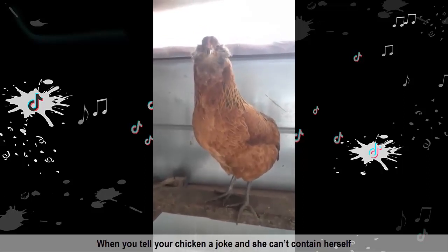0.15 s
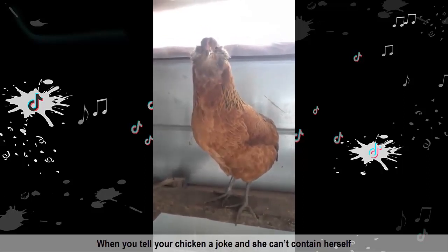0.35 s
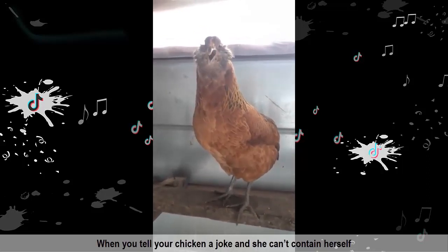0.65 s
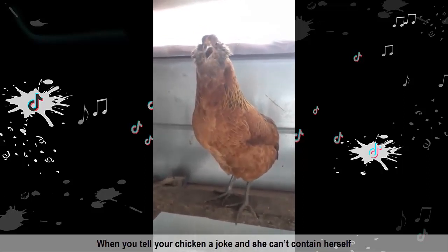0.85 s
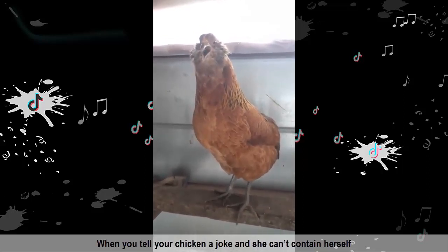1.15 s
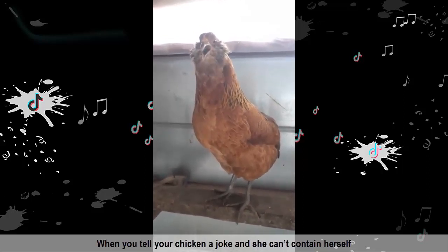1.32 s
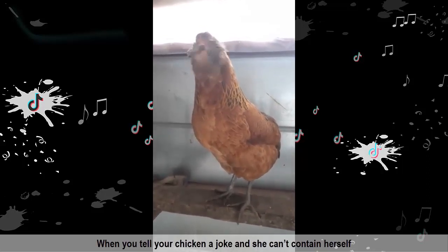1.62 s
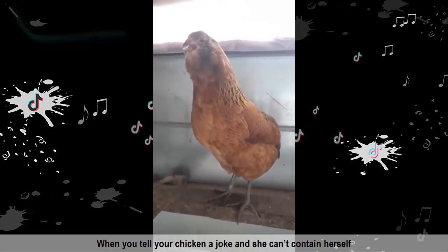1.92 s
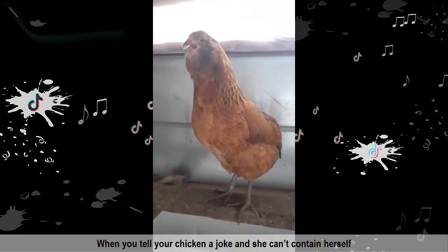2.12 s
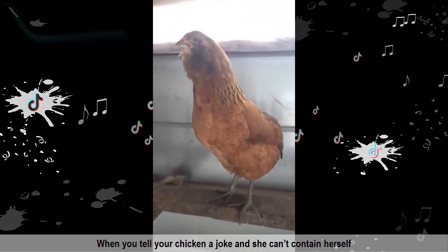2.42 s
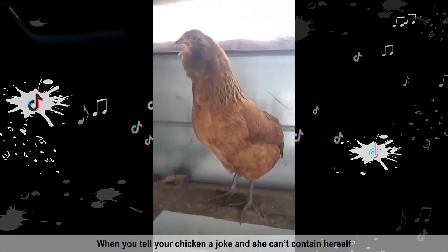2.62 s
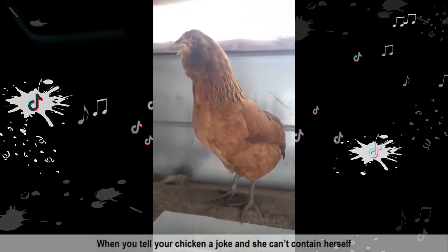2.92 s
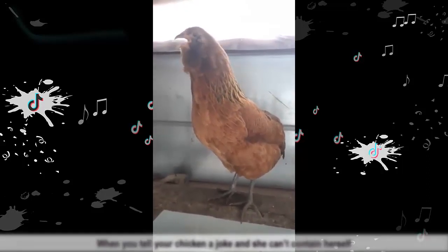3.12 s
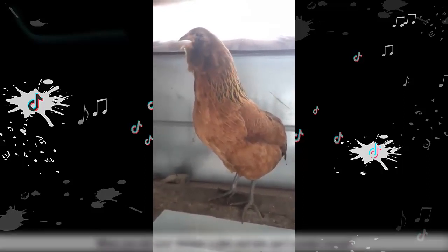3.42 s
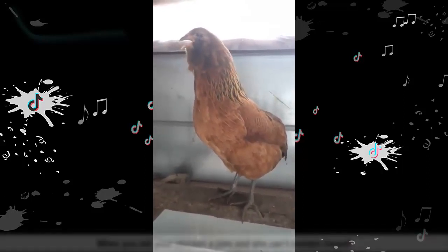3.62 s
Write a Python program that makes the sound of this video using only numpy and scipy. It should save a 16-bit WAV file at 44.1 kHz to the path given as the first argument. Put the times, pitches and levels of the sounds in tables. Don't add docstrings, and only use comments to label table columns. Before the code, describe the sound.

A hen cackles close to a stereo phone in a small, briefly echoing coop. Low yard rumble leads in; at 0.3 s her rough voice swells, dips low, then jumps into a held squawk from 0.7 to 1 s. About six low croaking clucks per second follow until 3.8 s, most flipping up to short ringing notes, though plainer around 1.8-2.3 s. Feet knock boards softly, strongest near 2.1 s.

```python
import sys
import numpy as np
from scipy import signal
from scipy.fft import rfft, irfft
from scipy.io import wavfile
from scipy.ndimage import uniform_filter1d

SR = 44100
rng = np.random.default_rng(int(sys.argv[2]) if len(sys.argv) > 2 else 0)


def gain_from_decibels(decibels):
    exponent = np.asarray(decibels, float) / 20
    return 10 ** exponent


def dump_mix(stems):
    frames = np.atleast_2d(stems).T
    limited = np.clip(frames, -1, 1)
    pcm = np.round(limited * 32767).astype(np.int16)
    wavfile.write(sys.argv[1], SR, pcm)


N = 165375

# time in seconds, effort in dB, pitch in Hz, mouth opening as a share.
SWELL = [
    (.322, -23, 374.2, 0.63),
    (0.376, -31, 340.7, 0.61),
    (0.392, -21, 345, 0.67),
    (0.431, -24.5, 396.2, 0.78),
    (.53, -20.5, 410, 0.87),
    (.575, -17.5, 263, 0.94),
    (0.599, -16, 248, 0.934),
    (.655, -16, 262.6, 0.97),
    (.69, -17, 287.3, 1.1),
]
SWELL_ROUGH = [.5, 1, .5, .95, 1, .7, .25, .25, .7]
# time in seconds, effort in dB, pitch in Hz, mouth opening as a share.
HELD = [
    (.69, -16, 425.7, 0.96),
    (0.751, -12, 436, 0.87),
    (0.77, -17.5, 429.5, 1.14),
    (.80, -16.5, 450.4, 1.53),
    (.825, -16.5, 453.8, 1.14),
    (0.892, -16.5, 446, 1.26),
    (0.914, -17, 454, 1.17),
    (0.928, -16, 455.6, 1.164),
    (0.976, -21, 445, 1.1),
]
HELD_ROUGH = [.4, .12, .5, .6, .1, .04, .05, .3, .8]
# time in seconds, throat tuning as a share,
# tilt in dB toward the lower of the two main resonances.
NECK = [(.4, 1.08, 4), (0.631, 0.98, -3), (.85, .99, 0.5), (1.05, 1.025, 0.5), (1.2, 1, 1.5),
        (1.38, 1.018, 1), (1.55, 0.94, -0.2), (1.72, 0.99, 2.8), (1.9, 0.95, 1.4), (2.15, 0.93, 1.8),
        (2.35, 0.98, 3.5), (2.55, 0.95, -0.4), (2.72, .98, 1.5), (2.9, 0.98, 2.5), (3.098, 1, 4),
        (3.279, 1, 2.5), (3.45, .97, 3), (3.64, 0.98, -.7)]
# start in seconds, length in seconds, effort in dB, pitch in Hz.
CROAKS = [(0.977, 0.081, -17, 304.3), (1.122, 0.11, -17.5, 297.2), (1.294, 0.11, -18, 296.8),
          (1.466, 0.097, -18.5, 295.3), (1.636, 0.086, -18.5, 294.6), (1.798, 0.097, -19.5, 292.3),
          (1.958, 0.078, -20, 286.3), (2.118, 0.083, -19.5, 278.4), (2.279, 0.11, -19, 299.4),
          (2.476, 0.067, -18, 291.7), (2.644, 0.086, -18.5, 299), (2.844, 0.091, -18.5, 303.6),
          (3.029, 0.093, -19, 305.3), (3.216, 0.045, -17.5, 295.1), (3.386, 0.042, -17.5, 309.5),
          (3.563, 0.039, -19.5, 312.4), (3.746, 0.052, -20.5, 293)]
CROAK_ROUGH = [.5, .25, .35, .5, .42, .5, .7, .55, .3, .5, .55, .6, .6, .6, .45, .6, .5]
# start in seconds, length in seconds, effort in dB, top pitch in Hz.
RINGS = [(1.02, 0.058, -17.5, 486), (1.208, 0.042, -19.5, 470), (1.375, 0.043, -17.5, 463.8),
         (1.551, 0.035, -21, 460.5), (1.718, 0.04, -25.5, 456), (2.381, 0.03, -22.5, 458.2),
         (2.54, 0.035, -16.5, 452), (2.713, 0.043, -18, 461), (2.909, 0.049, -16, 470),
         (3.094, 0.049, -16.5, 469), (3.258, 0.067, -15.5, 468), (3.432, 0.063, -16, 476.4),
         (3.6, 0.073, -16, 454.7)]
RING_ROUGH = [.6, .55, .6, .4, .7, .65, .2, .35, .22, .2, .1, .08, .05]
# frequency in Hz, width in Hz, level in dB.
THROAT = [(410, 181, -13), (713, 309, -8), (1025.7, 246, -1.2), (1397, 262, 3), (1973, 694, -11.5),
          (2457, 230, -13), (3220, 890, -11), (5280, 4200, -26), (6750, 4040, -25), (10860, 6200, -36)]
# frequency in Hz, width in Hz, depth from 0 to 1.
POCKETS = [(1653, 198, 0.62), (2586, 316, 1), (4307, 370, 1)]
# time in seconds, peak in dB, pitch in Hz, time to fall by 60 dB in seconds.
KNOCKS = [
    (0.083, -46, 74, 0.45),
    (1.668, -41, 99.4, 0.23),
    (1.884, -31, 222, 0.08),
    (1.978, -32, 170.3, 0.102),
    (2.111, -23, 213, 0.18),
    (3.592, -46, 87.5, 0.11),
]
# frequency in Hz, level in dB per Hz.
YARD = [(15, -57), (25, 16.5), (151, -23.5), (192, -5.5), (425, -27.5), (1360, -27), (9660, -42),
        (12600, -30.5), (14000, -72.5)]
# frequency in Hz, time to fall by 60 dB in seconds.
COOP = [(300, 0.25), (790, 0.16), (2090, 0.24), (5510, 0.22)]

JITTER, SHIMMER_DB, AIR = .16, 5, .55
HISS, TOP_PARTIAL_HZ = .36, 13050
STOP_S = 0.0099

CROAK_DIP, CROAK_CLIMB = 0.085, 0.04004
TICK_DB, TICK_GAP_S, CROAK_RISE_S = -13, .002, .014

RING_FLAT, RING_SAG, RING_TOP = .03, .14, 0.48
RING_START_DB, RING_END_DB = -4.5, -9
RING_CHEST_DB, RING_BLOOM_DB, RING_LOCK_DB = -1, 1, -3
RING_SHIFT_DB = 11

WANDER, POCKET_SINK = .03, .02

LEFT_LEAD_S, TREBLE_PAN_DB = 0.00029, 5
SHADE_DB = 2.
TAIL_DB, WALL_DB = -6, -14
SCATTER_DB, SCATTER_S = 4, .011
HEAD_TURN_S = .09

YARD_DB = -54.5


def evened(x):
    return x / np.sqrt(np.mean(x ** 2) + 1e-20)


def read(points, hz):
    f, value = np.transpose(points)
    return np.interp(np.log(hz + 1), np.log(f + 1), value)


def add(mix, s, sound):
    part = mix[round(s * SR):][:len(sound)]
    part += sound[:len(part)]


def resonate(x, hz, width):
    turn = np.exp(2j * np.pi * np.cumsum(hz) / SR)
    r = np.exp(-np.pi * width / SR)
    return 2 * (turn * signal.lfilter([(1 - r) ** 2], [1, -2 * r, r * r], x / turn + 1e-18)).real


def syrinx(hz, rough, chest_db=-20, lock_db=-20, bloom_db=-20):
    stray, size = rng.standard_normal((400, 2)).T
    plain = np.cumsum(hz) / SR
    stray = np.clip(stray[plain.astype(int)], -2, 2)
    turns = np.cumsum(hz * (1 + JITTER * rough * stray)) / SR
    pulses = sum(np.cos(2 * np.pi * k * turns + 0.0239 * k ** 2) * (k * hz < TOP_PARTIAL_HZ)
                 for k in range(1, 50))
    pulses += gain_from_decibels(chest_db) * np.cos(2 * np.pi * turns)
    pulses += gain_from_decibels(bloom_db) * np.cos(4 * np.pi * turns)
    pulses += gain_from_decibels(lock_db) * np.cos(6 * np.pi * turns)
    size = gain_from_decibels(SHIMMER_DB * rough * np.clip(size[(turns + .5).astype(int)], -2.5, 1.2))
    breath = rng.standard_normal(len(hz))
    sound = evened(pulses) + AIR * rough * breath + HISS * np.gradient(breath)
    return sound * size / np.sqrt(1 + (AIR * rough) ** 2)


def breath_edges(t, length, rise):
    return np.clip(t / rise, 0, 1) * np.clip((length - t) / STOP_S, 0, 1)


def squawk(rows, rough, chest_db, lock_db):
    s, db, hz, _ = np.transpose(rows)
    t = np.arange(s[0], s[-1] + STOP_S, 1 / SR)
    voice = syrinx(np.interp(t, s, hz), np.interp(t, s, rough), chest_db, lock_db)
    effort = gain_from_decibels(np.interp(t, s, db)) * breath_edges(t - s[0], t[-1] - s[0], 0.0019)
    return s[0], effort * voice


def croak(start, length, db, hz, rough):
    t = np.arange(0, length + STOP_S, 1 / SR)
    u = t / length
    ticks = start > 1.6
    gap = TICK_GAP_S * ticks
    effort = gain_from_decibels(db) * breath_edges(t - gap, length + STOP_S - gap, CROAK_RISE_S)
    pitch = hz * (1 - CROAK_DIP * np.sin(np.pi * u) + CROAK_CLIMB * u ** 2)
    rough = rough + (1 - rough) * np.exp(-t / 0.0156) * 0.564
    tick = gain_from_decibels(TICK_DB) * np.exp(-t / .00007) * ticks
    return start, effort * syrinx(pitch, rough) + tick


def ring(start, length, db, hz, rough):
    t = np.arange(0, length, 1 / SR)
    u = t / length
    early = np.clip(1 - u / RING_TOP, 0, 1)
    late = np.clip((u - RING_TOP) / (1 - RING_TOP), 0, 1)
    effort = gain_from_decibels(db + RING_START_DB * early + RING_END_DB * late ** 1.5) * breath_edges(t, length, .006)
    before = np.clip(1 - u / 0.394, 0, 1)
    after = np.clip((u - .4) / 0.575, 0, 1)
    pitch = hz * (1 - RING_FLAT * before ** 2 - RING_SAG * after ** 2)
    rough = rough + 0.23 * before ** 2 + 0.6 * after ** 2
    lock_db = RING_LOCK_DB - RING_SHIFT_DB * (early + late)
    bloom_db = RING_BLOOM_DB - RING_SHIFT_DB * late
    return start, effort * syrinx(pitch, rough, RING_CHEST_DB, lock_db, bloom_db)


def throat(drive):
    t = np.arange(N) / SR
    s, _, _, mouth = np.transpose([*SWELL, *HELD])
    mouth = np.minimum(np.interp(t, s, mouth), 1)
    stray = rng.standard_normal((len(THROAT) + len(POCKETS), 60))
    strays = [1 + WANDER * np.interp(t, np.linspace(0, N / SR, 60), row) for row in stray]
    at, tuning, tilt_db = np.transpose(NECK)
    tract = mouth * np.interp(t, at, tuning)
    tilt_db = np.interp(t, at, tilt_db)
    lean = {1: -.6, 2: 1, 3: -1}
    out = np.zeros(N)
    for k, (f, width, db) in enumerate(THROAT):
        level = (-1) ** k * gain_from_decibels(db + lean.get(k, 0) * tilt_db) * mouth ** (0.9 * k)
        out = out + level * resonate(drive, f * tract * strays[k], width)
    for k, (f, width, depth) in enumerate(POCKETS):
        pocket_hz = f * (1 - POCKET_SINK * tilt_db) * strays[-1 - k]
        out = out - min(depth, 1) * resonate(out, pocket_hz, width)
    return -gain_from_decibels(10.5) * out


def hen():
    notes = [squawk(SWELL, SWELL_ROUGH, chest_db=-11, lock_db=-7.5),
             squawk(HELD, HELD_ROUGH, chest_db=-11.0, lock_db=-8)]
    notes += [croak(*row, rough) for row, rough in zip(CROAKS, CROAK_ROUGH)]
    notes += [ring(*row, rough) for row, rough in zip(RINGS, RING_ROUGH)]
    drive = np.zeros(N)
    for start, sound in notes:
        add(drive, start, sound)
    return throat(drive)


def ports(x):
    hz = np.fft.rfftfreq(N, 1 / SR)
    shade_db = SHADE_DB * np.sin(np.pi * np.clip((hz - 1150) / 400, -1, 1))
    half = np.exp(1j * np.pi * hz * LEFT_LEAD_S) * gain_from_decibels(TREBLE_PAN_DB * (hz / 9000 - 0.165) + shade_db)
    return irfft(rfft(x) * np.array([half, 1 / half]), N)


def echo_path():
    size = SR // 2
    taps = np.zeros((2, size))
    at = np.arange(20, size - 20, 20)
    signs = rng.choice([-1., 1.], (2, len(at)))
    np.put_along_axis(taps, at + rng.integers(0, 20, (2, len(at))), signs, 1)
    hz, t, z = signal.stft(taps, SR, nperseg=256)
    tail = signal.istft(z * gain_from_decibels(-60 * t / read(COOP, hz)[:, None]), SR, nperseg=256)[1][:, :size]
    scatter = taps * np.exp(-np.arange(size) / SR / SCATTER_S)
    scatter = signal.sosfilt(signal.butter(2, 2200, "high", fs=SR, output="sos"), scatter)
    tail = gain_from_decibels(TAIL_DB) * tail / np.linalg.norm(tail[0])
    tail = tail + gain_from_decibels(SCATTER_DB) * scatter / np.linalg.norm(scatter[0])
    walls = np.zeros_like(tail)
    bounces = gain_from_decibels(WALL_DB) * rng.uniform(-1, 1, (2, 6))
    np.put_along_axis(walls, rng.integers(20, 400, (2, 6)), bounces, 1)
    return tail + walls


def coop(x):
    out = 0
    turn = np.pi * np.arange(N) / SR / (3 * HEAD_TURN_S)
    for k in range(3):
        feed = x * np.sqrt(2 / 3) * np.cos(turn + k * np.pi / 3)
        out = out + signal.fftconvolve(feed[None], echo_path(), axes=1)[:, :N]
    return out


def knocks():
    out, t = np.zeros(N), np.arange(9000) / SR
    for s, db, hz, t60 in KNOCKS:
        add(out, s, gain_from_decibels(db - 60 * t / t60) * np.minimum(t / 0.0064, 1) * np.sin(2 * np.pi * hz * t))
    return out


def yard():
    frames, hz = N // 256 + 5, np.fft.rfftfreq(1024, 1 / SR)
    a, b, c, d, patches = rng.standard_normal((frames, 513, 5)).T
    patches = evened(uniform_filter1d(uniform_filter1d(patches, 8, 0), 14, 1))
    same = np.clip(.93 - hz / 2500, 0, 1)[:, None]
    left = a + 1j * b
    right = same * left + np.sqrt(1 - same ** 2) * (c + 1j * d)
    colour_db = (read(YARD, hz) - 22.0 * (hz < 50))[:, None] + 3.5 * patches
    z = np.array([left, right]) * gain_from_decibels(colour_db)
    return gain_from_decibels(YARD_DB) * evened(signal.istft(z, nperseg=1024, noverlap=768)[1][:, :N])


def scene():
    voice = hen()
    return ports(voice) + coop(voice) + knocks() + yard()


def roll_off(x):
    return signal.sosfilt(signal.butter(12, 14360, fs=SR, output="sos"), x)


def record(dry):
    return roll_off(dry)


dry = scene()
out = record(dry)
dump_mix(out)
```